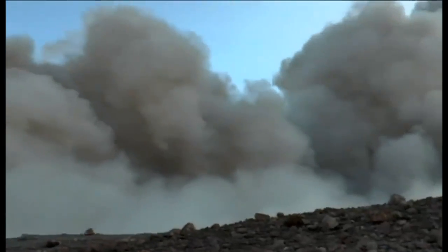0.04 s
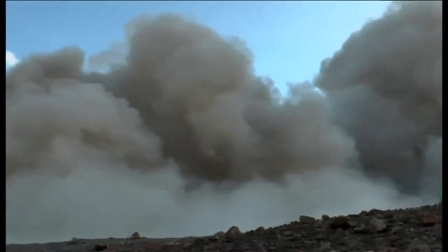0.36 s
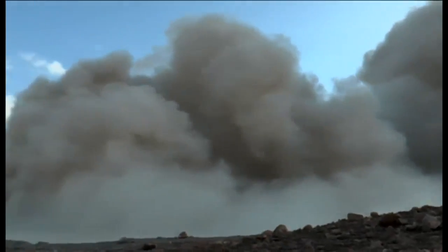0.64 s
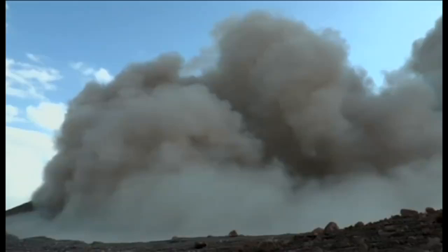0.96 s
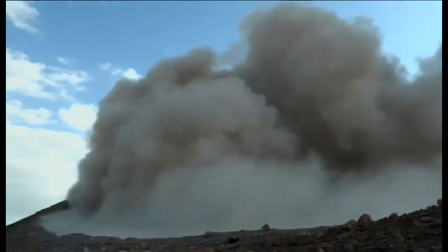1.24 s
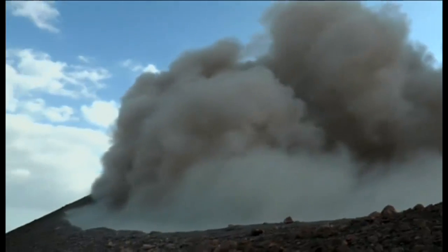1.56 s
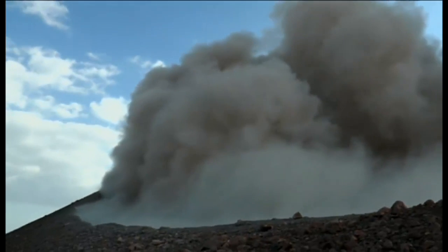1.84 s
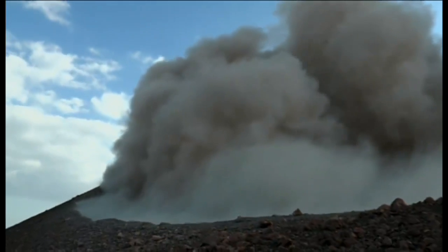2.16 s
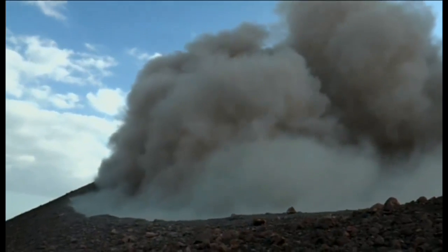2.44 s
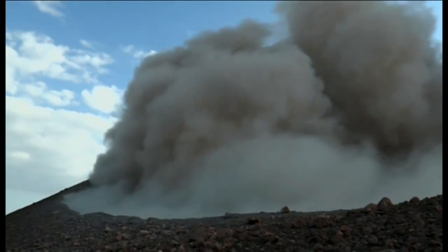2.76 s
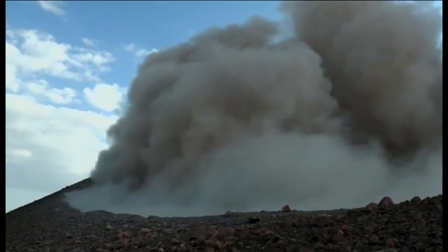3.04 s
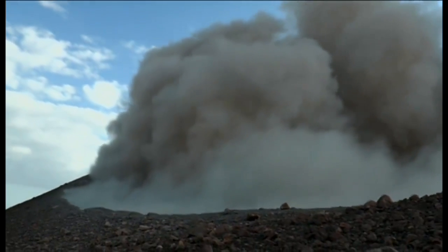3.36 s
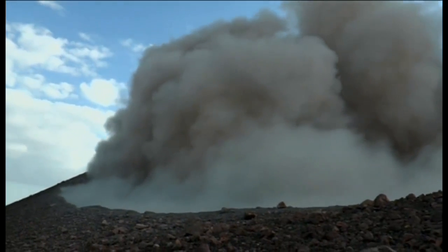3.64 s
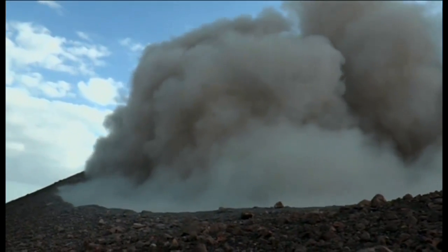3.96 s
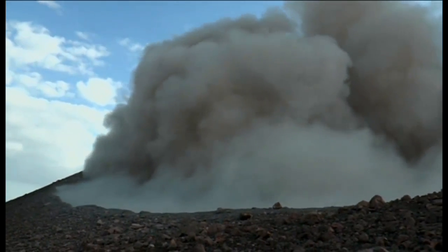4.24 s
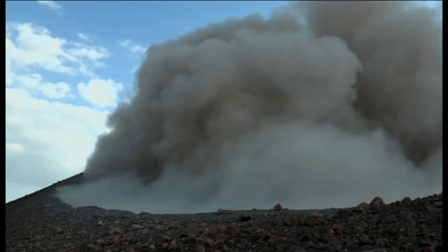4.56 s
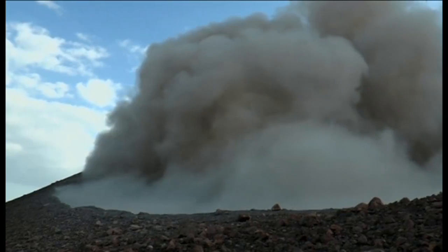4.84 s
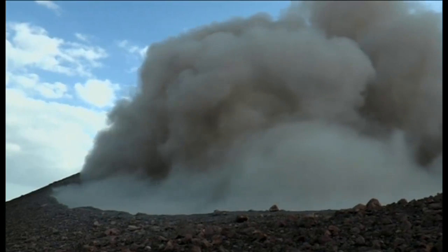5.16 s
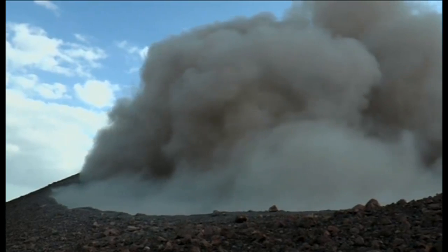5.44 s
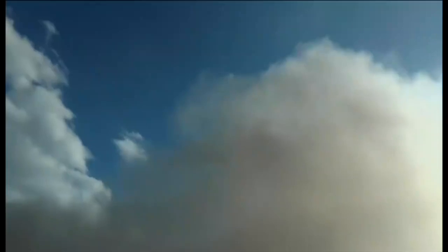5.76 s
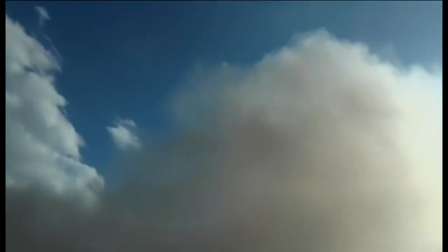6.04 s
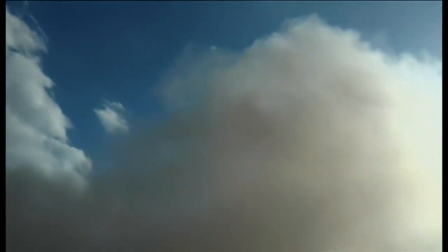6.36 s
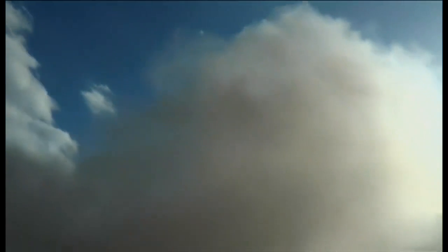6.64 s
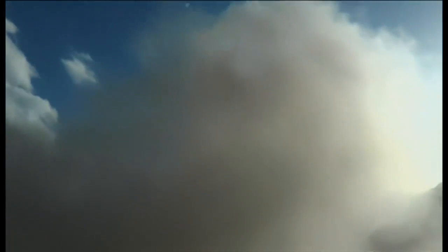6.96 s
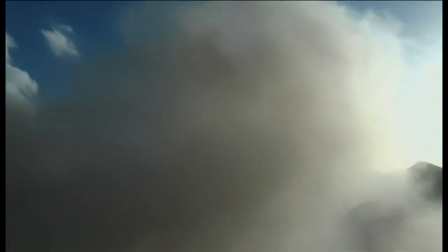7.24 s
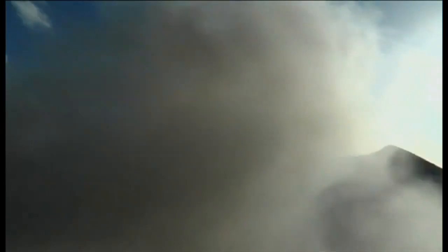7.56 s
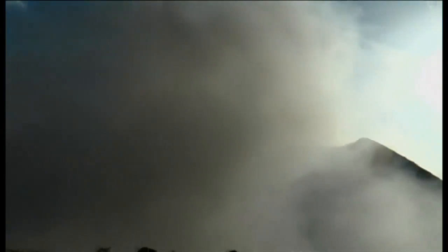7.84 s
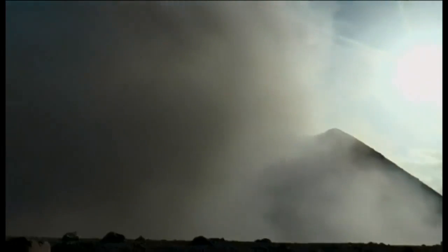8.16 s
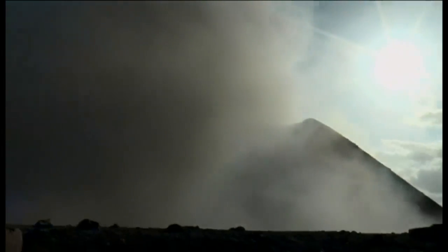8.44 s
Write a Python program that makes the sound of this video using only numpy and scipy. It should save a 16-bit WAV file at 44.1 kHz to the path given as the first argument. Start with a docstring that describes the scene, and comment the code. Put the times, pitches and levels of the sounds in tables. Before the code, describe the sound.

Outdoors on an open rocky slope, wind hits the microphone directly, rumbling, fluttering and popping, and dropping away for instants. A distant ash flow hisses very faintly underneath, and a few loose stones barely clink. Then the breeze changes abruptly to a fuller, more even roar, with a rough rush, light rustling grit and sharp buffets near the end.

```python
"""On a bare volcano slope, gusty wind buffets a camera microphone while an ash flow hisses far off. Slow air
rumbles and drops into brief lulls; as it speeds up, its swirls (eddies) pass faster and the rumble rises into
ragged puffs and sharp pops. Blown grit rustles and a few loose stones clink. With a click the scene changes to
a stronger, steadier wind roar; a limiter holds the peaks down."""
import sys
import numpy as np
from scipy import signal
from scipy.fft import rfft, irfft, next_fast_len
from scipy.io import wavfile
from scipy.ndimage import uniform_filter1d, minimum_filter1d, map_coordinates

SR = 44100
rng = np.random.default_rng(int(sys.argv[2]) if len(sys.argv) > 2 else 0)


def wav_record(signal):
    """Record a signal, one row per channel, as 16-bit PCM in the file named by sys.argv[1]."""
    frames = np.transpose(np.atleast_2d(signal))
    bounded = np.clip(frames, -1, 1)
    # unit amplitude maps onto the largest positive 16-bit level
    quanta = np.round(bounded * 32767).astype(np.int16)
    wavfile.write(sys.argv[1], SR, quanta)


N = 374409
T = np.arange(N) / SR
GALE_START_S = 5.678


def amp(db):
    """Turn decibels into a gain to multiply by."""
    return 10 ** (np.asarray(db) / 20)


def unit(x):
    """Scale x to an average (rms) level of 1."""
    return x / np.sqrt(np.mean(x ** 2) + 1e-20)


def curves(rows):
    """Join a table's rows with straight lines: one curve for each column after the time."""
    times, *columns = np.transpose(rows)
    return [np.interp(T, times, column) for column in columns]


def wobble(per_s):
    """A smooth curve through per_s random values a second."""
    return map_coordinates(rng.standard_normal(8192), [T * per_s + 2], mode="wrap")


def bell(s, duration):
    """A smooth bump of height 1 at time s, duration seconds wide at half height."""
    bump = np.zeros(N)
    near = slice(max(int((s - .25) * SR), 0), int((s + .25) * SR))
    bump[near] = .5 ** ((2 * (T[near] - s) / duration) ** 2)
    return bump


def swells(rows):
    """A loudness curve made of bumps (time [s], level [dB], duration [s]) whose powers add."""
    return np.sqrt(sum(amp(db) ** 2 * bell(s, duration) for s, db, duration in rows))


def gain_at(tone, hz):
    """Read the gain at hz from a tone table (frequency [Hz], level [dB])."""
    freqs, db = np.transpose(tone)
    return amp(np.interp(np.log(hz + 1), np.log(freqs + 1), db))


def filtered(x, response):
    """Turn each frequency in x up or down by response(hz)."""
    size = next_fast_len(N + 8192)
    return irfft(rfft(x, size) * response(np.fft.rfftfreq(size, 1 / SR)), size)[:N]


def coloured(x, tone):
    """Shape x with a tone table, at an average level of 1."""
    return unit(filtered(x, lambda hz: gain_at(tone, hz)))


def noise(tone):
    """Smooth noise with the given tone."""
    return coloured(rng.standard_normal(N), tone)


def turbulence(tone, lumps_db, span_s):
    """Churning air: noise that comes in quick lumps but stays even over span_s seconds."""
    lumpy = coloured(rng.standard_normal(N) * amp(lumps_db), tone)
    width = max(int(span_s * SR), 8)
    power = uniform_filter1d(uniform_filter1d(lumpy ** 2, width), width)
    return unit(lumpy / np.sqrt(np.abs(power) + 1e-4))


def spikes(tone, per_s):
    """Sharp jumps in air pressure at random times, slightly uneven in size."""
    hits = rng.random(N) < per_s / SR
    return coloured(hits * amp(0.5 * rng.standard_normal(N)), tone)


# the breeze between puffs (time [s], rumble level [dB], flutter level [dB])
BREEZE_LEVELS = [(0.0, -21.5, -34), (0.53, -22, -38), (0.78, -22.0, -33.5), (1.18, -20.0, -34),
                 (1.45, -19.5, -42), (2.01, -19, -38.5), (2.23, -22.5, -48), (2.57, -19.5, -42),
                 (2.78, -20.5, -46), (3.27, -20.0, -44), (3.58, -18.5, -41), (3.82, -18, -43.5),
                 (4.23, -19.0, -52), (4.85, -22, -39), (5.03, -22.5, -37), (5.27, -19.0, -42.0),
                 (5.68, -20.0, -36.5)]
# tones (frequency [Hz], level [dB])
EDDY_TONE = [(30, 6.5), (300, -2.5), (450, -2), (600, -6.5), (850, -11.5), (1600, -22), (3200, -37.5),
             (6400, -61), (12000, -81)]  # swirling air at full speed
PORT_TONE = [(12, -19.5), (25, -29), (38, -23), (65, -6), (105, 2), (165, 3), (245, 1), (350, 0.5),
             (700, -2), (2000, -10)]  # how the port, the microphone's opening, colours the wind
TEAR_TONE = [(500, -1), (1200, 16), (2000, 6), (3000, -1.5), (4700, -8), (5800, -18.5), (8000, -25.5),
             (11000, -35)]  # air tearing on the port's edge
SPIKE_TONE = [(200, -11), (600, -1.5), (1200, 0), (2000, -9), (4000, -29), (8000, -40.5), (12000, -56.5)]  # single pressure spikes


def gusts(thump, lull_db):
    """A fixed pattern of eddies blows past the port: faster air plays it higher and rougher."""
    rumble_db, flutter_db = curves(BREEZE_LEVELS)
    flap, spit = wobble(per_s=80), wobble(per_s=300)
    breeze_flutter = amp(flutter_db - lull_db - 1.59 + 3 * flap + 3 * spit)
    puff_flutter = amp(0.3946 + 0.708 * flap + 2.2 * spit) * thump
    flutter = np.hypot(breeze_flutter, puff_flutter)
    rumble = amp(rumble_db - lull_db + 1.08 * wobble(per_s=18))
    force = np.hypot(rumble, .55 * flutter)
    # the share of flutter sets the air speed, 1 at full wind
    speed = np.clip((flutter / force) ** .44, .15, 1.3)
    eddies = turbulence(EDDY_TONE, 2.4 * wobble(250), span_s=0.013)
    pressure = map_coordinates(eddies, [np.cumsum(speed)], mode="wrap")
    buffet = filtered(amp(4.5) * force * speed ** 0.071 * pressure, lambda hz: gain_at(PORT_TONE, hz))
    # air dragging over the port's edge adds a faint rasp and sharp spikes
    rasp = amp(-35) * turbulence(TEAR_TONE, 4 * wobble(600), span_s=.03)
    sputter = amp(-22.5) * spikes(SPIKE_TONE, per_s=110)
    return buffet + flutter * (rasp + sputter)


# slow swells under the breeze, even in the lulls (time [s], level [dB])
DEEP_LEVELS = [(0.0, -29.5), (1.3, -36), (2.0, -37), (3.9, -39.5), (4.7, -34.5), (5.68, -36)]
# their tone (frequency [Hz], level [dB])
DEEP_TONE = [(10, -3.5), (22, 1), (45, -3), (70, 1), (110, -11), (250, -49), (600, -120)]


def deep_rumble():
    """Large, slow eddies press on the microphone."""
    level_db, = curves(DEEP_LEVELS)
    return amp(level_db) * noise(DEEP_TONE)


# the distant ash flow (time [s], hiss level [dB], roar level [dB])
ASH_LEVELS = [(0.0, -64.5, -57), (1.59, -64.5, -46), (2.14, -65, -49.5), (2.86, -59.5, -45),
              (3.1, -67.5, -55.5), (3.42, -58, -45), (3.8, -67.5, -49.5), (4.24, -66, -44),
              (4.73, -67.5, -61), (5.22, -64, -54.5), (5.68, -65, -45.5)]
# tones of its hiss and its roar (frequency [Hz], level [dB])
ASH_HISS_TONE = [(400, -13), (900, 7.5), (1600, 0.5), (2800, 2), (4200, -5), (7000, -12), (11000, -32)]
ASH_ROAR_TONE = [(100, -5.5), (350, 3), (600, 4.5), (1000, -3), (1600, -10.5), (2500, -19), (4000, -38.5),
                 (8000, -60)]


def ash_flow():
    """Far stones and ash tumble down the slope: a dull roar under a soft, uneven hiss."""
    hiss_db, roar_db = curves(ASH_LEVELS)
    surge = wobble(per_s=25)
    hiss = amp(hiss_db + 1.7 * surge) * noise(ASH_HISS_TONE)
    roar = amp(roar_db + 0.74 * surge) * noise(ASH_ROAR_TONE)
    return hiss + roar


# tone of the microphone's hiss (frequency [Hz], level [dB])
MIC_TONE = [(100, 5), (4000, -0.5), (8000, 2), (10000, -4), (15500, -1)]


def microphone_hiss():
    """The microphone makes a faint, steady noise of its own."""
    return amp(-67) * noise(MIC_TONE)


# eddies that hit the port (time [s], thump level [dB], tearing level [dB], duration [s])
EDDY_HITS = [(0.018, -28.5, -47, 0.033), (0.174, -19.5, -50, 0.02), (0.231, -31, -46.5, 0.014),
             (0.288, -26.5, -47.5, 0.018), (0.396, -22, -46.5, 0.024), (0.606, -26.5, -53.5, 0.015),
             (0.632, -21, -51, 0.0089), (0.799, -26, -56.5, 0.0058), (0.838, -22.5, -55, 0.024),
             (0.899, -19.5, -43, 0.0086), (0.92, -26, -45, 0.014), (1.023, -25, -50, 0.008),
             (1.052, -22, -40, 0.016), (1.158, -28, -57, 0.021), (1.244, -26.0, -52, 0.06),
             (1.356, -28, -66, 0.016), (1.545, -29, -51.5, 0.0087), (1.925, -31, -51, 0.038),
             (2.015, -28.5, -48.5, 0.043), (2.438, -34, -48, 0.012), (2.539, -38, -48.5, 0.0068),
             (2.67, -29, -59, 0.015), (2.952, -29.5, -54, 0.024), (3.041, -26, -64, 0.017),
             (3.46, -29, -56, 0.015), (3.618, -33.5, -49, 0.03), (3.714, -29, -63.5, 0.015),
             (3.929, -35, -52, 0.043), (4.07, -32, -59, 0.051), (4.195, -26.5, -49, 0.038),
             (4.271, -27, -56.5, 0.041), (4.385, -30.5, -57.5, 0.016), (4.465, -36, -51, 0.042),
             (4.57, -22.5, -48.5, 0.032), (4.907, -30, -48, 0.011), (4.994, -23.5, -52, 0.014),
             (5.134, -26.5, -52.5, 0.021), (5.253, -24.5, -63, 0.012), (5.287, -31.5, -58, 0.05),
             (5.455, -30, -56, 0.014), (5.492, -35, -50.5, 0.02), (5.535, -28, -46.5, 0.012),
             (6.477, -25, -41.5, 0.027), (6.571, -24, -36.5, 0.033), (7.838, -19, -37, 0.017),
             (8.144, -20, -36, 0.0082), (8.181, -27.5, -33.5, 0.0036), (8.352, -26, -39.5, 0.012),
             (8.426, -22.5, -41.5, 0.021), (8.469, -23.5, -38, 0.032)]


def puffs():
    """Fast eddies hit the port: returns a thump curve that swells the wind, and a tearing sound."""
    thump = swells((s, db, duration) for s, db, _, duration in EDDY_HITS)
    tear = swells((s, db, duration) for s, _, db, duration in EDDY_HITS)
    return thump, amp(-1.1) * tear * turbulence(TEAR_TONE, 5.9 * wobble(450), span_s=0.023)


# single eddies bursting (time [s], level [dB], pitch [Hz])
EDDY_BURSTS = [(0.037, -22.5, 850), (0.1789, -24, 680), (0.2493, -8.5, 457), (0.284, -8, 332),
               (0.3975, -22.5, 930), (0.5302, -11.5, 332), (0.5729, -16, 600), (0.631, -10, 600),
               (0.634, -11.5, 596), (0.6446, -25, 940), (0.6908, -24, 700), (0.7401, -16, 530.4),
               (0.8306, -19, 623.4), (0.8434, -15.5, 611.3), (0.8985, -10.5, 630), (0.9103, -16.5, 560),
               (0.9188, -16.5, 720), (0.9319, -14, 571.3), (0.9814, -9.5, 380), (1.0217, -12.5, 517),
               (1.048, -17, 715), (1.1462, -11, 558.3), (1.1644, -17, 569), (1.186, -10, 680),
               (1.2224, -20, 710), (1.2507, -20.5, 750), (1.2982, -18.5, 718.5), (1.3483, -25.5, 730),
               (1.3646, -15.0, 330), (1.4783, -17, 430.3), (1.5443, -18.5, 518.4), (1.5872, -17, 478.7),
               (1.7242, -12.5, 415), (2.0122, -20.5, 608.8), (2.0324, -17, 568.3), (2.6608, -16, 589),
               (2.6773, -18, 560), (2.9468, -24, 540), (3.0448, -13.5, 550), (3.4666, -14.5, 480),
               (3.7109, -13, 479.7), (3.7355, -20.5, 450), (3.9083, -16, 458.8), (4.0997, -18, 699.4),
               (4.178, -14, 569.6), (4.3873, -14, 450), (4.4449, -21, 710), (4.554, -8.5, 520),
               (4.604, -23, 610.7), (4.9136, -15, 610), (5.0007, -10.5, 399.6), (5.0403, -15.5, 519.4),
               (5.1366, -14, 619.5), (5.147, -20, 521), (5.2654, -22, 711), (5.3067, -15, 550.7),
               (5.3317, -17, 419.7), (5.359, -16.5, 544), (5.3842, -18, 444), (5.4451, -21.5, 679),
               (5.5355, -12, 520), (5.8106, -16, 419.8), (5.9125, -14.5, 820), (6.0822, -6.5, 440),
               (6.1257, -15, 600), (6.348, -7, 660), (6.483, -12, 700), (6.4945, -17, 710),
               (6.5938, -14.5, 517), (7.0211, -9.5, 444), (7.483, -6.5, 520), (7.616, -7, 450),
               (7.7667, -8, 400), (7.8528, -10.5, 710), (8.1475, -13.5, 820), (8.1813, -17, 850),
               (8.3201, -10, 644), (8.3429, -17.5, 850), (8.425, -15, 800), (8.456, -11, 820),
               (8.4774, -1.5, 820)]


def pops(damping=1.04, fray=.45, fray_s=.0035):
    """An eddy bursts at the port: one steep, frayed swing of pressure, shorter for a smaller eddy."""
    out, size = np.zeros(N + SR), 2048
    middle = size // 2
    fray_shape = .5 ** ((2 * (np.arange(size) - middle) / SR / fray_s) ** 2)
    for s, db, hz in EDDY_BURSTS:
        ratio = 1j * np.fft.rfftfreq(size, 1 / SR) / hz
        band = ratio / (1 + damping * ratio + ratio ** 2) ** 2  # a broad hump around the pitch
        phase = np.exp(2j * np.pi * rng.random())
        swing = unit(np.roll(irfft(phase * band), middle))
        shreds = unit(signal.fftconvolve(fray_shape * rng.standard_normal(size), swing, "same"))
        burst = unit(swing + fray * shreds) / np.abs(swing).max()
        start = max(round(s * SR) - middle, 0)
        out[start:start + size] += amp(db) * burst
    return out[:N]


# pockets of slack air (time [s], depth [dB], duration [s])
SLACK_AIR = [(0.095, 13.5, 0.066), (0.209, 8, 0.025), (0.265, 7, 0.01794), (0.34, 9.5, 0.06),
             (0.472, 8.0, 0.09), (0.515, 13, 0.007), (0.558, 13.5, 0.014), (0.672, 18, 0.02),
             (0.88, 6.5, 0.02005), (0.955, 6, 0.0249), (1.008, 4.5, 0.0092), (1.175, 10, 0.00996),
             (1.332, 6, 0.01349), (1.45, 5, 0.062), (1.868, 9, 0.02526), (2.119, 8, 0.052),
             (2.269, 7.5, 0.037), (2.4, 10, 0.0298), (2.593, 5.5, 0.015), (2.854, 8, 0.065),
             (3.136, 2.5, 0.0966), (3.268, 6, 0.025), (3.359, 2.5, 0.079), (3.787, 11, 0.038),
             (4.335, 8.5, 0.03), (4.415, 6, 0.02002), (4.662, 13.5, 0.0505), (4.744, 24.5, 0.063),
             (4.961, 9.5, 0.02), (5.022, 6, .014), (5.352, 6.5, .012), (5.37, 6, .012), (5.405, 8, 0.04),
             (5.577, 8.5, 0.037), (6.44, 6.5, 0.018), (7.189, 7.5, 0.018), (7.609, 4, 0.016),
             (7.672, 11, 0.012), (8.062, 6, 0.012), (8.171, 6.5, 0.02), (8.264, 8.5, 0.025),
             (8.335, 6.5, 0.01), (8.409, 8.5, 0.013)]


def lulls():
    """The air goes slack for a moment: returns how many decibels the wind drops."""
    return sum(depth_db * bell(s, duration) for s, depth_db, duration in SLACK_AIR)


# flurries of blown grit (time [s], level [dB], duration [s])
GRIT_FLURRIES = [(0.14, -55.5, 0.017), (0.23, -57, 0.11), (0.39, -57, 0.021), (1.1, -64, 0.23),
                 (1.88, -66.5, 0.14), (3.4, -63.5, 0.11), (6.39, -57, 0.076), (7.44, -56, .36),
                 (7.93, -54.5, .3)]
# their tone (frequency [Hz], level [dB])
GRIT_TONE = [(900, -22), (2200, 3.5), (3300, 5.5), (5000, -5), (6000, -12), (8000, -19.5), (11000, -27.5)]


def blown_grit():
    """Gusts sweep fine grit over the ground in a grainy rustle."""
    return swells(GRIT_FLURRIES) * turbulence(GRIT_TONE, 10 * wobble(700), span_s=.02)


# ticks in the hardest buffets (time [s], level [dB], time to fade by 60 dB [s])
WIND_TICKS = [(0.182, -41, 0.0055), (0.259, -48, 0.0043), (0.634, -44, 0.0075), (0.798, -46, 0.0045),
              (0.897, -45.5, 0.0059), (1.185, -49.5, 0.0074), (3.709, -48.5, 0.0086), (3.713, -51, 0.006),
              (5.262, -51.5, 0.048), (8.18, -48.5, 0.012)]
# their tone (frequency [Hz], level [dB])
TICK_TONE = [(1500, -21), (2800, 2), (4500, 7.5), (8500, -3.5), (15000, -18.5)]


def clicks():
    """Tiny bright bursts that die at once, and a louder click where the scene changes."""
    loudness = np.zeros(N)
    for s, db, fade_s in [*WIND_TICKS, (GALE_START_S, -34, 0.0083)]:
        loudness += (T >= s) * amp(db - 60 * np.clip((T - s) / fade_s, 0, 3))
    return loudness * turbulence(TICK_TONE, lumps_db=0, span_s=.001)


# clinks and scrapes of stones (time [s], level [dB], pitch [Hz], duration [s])
STONE_CLINKS = [(3.675, -58.5, 2796, 0.0084), (4.22, -52, 3605, 0.0054), (5.411, -56, 3950, 0.011),
                (5.432, -63.5, 3830, .033), (6.772, -69, 9200, .06)]


def stones():
    """Loose stones knock and slide, each ringing around its own pitch."""
    out = np.zeros(N)
    for s, db, hz, duration in STONE_CLINKS:
        ring = filtered(rng.standard_normal(N), lambda f: 1 / (1 + ((f - hz) / (0.15 * hz)) ** 2))
        out += swells([(s, db, duration)]) * unit(ring)
    return out


# the strong wind (time [s], roar level [dB], rush level [dB])
GALE_LEVELS = [(5.68, -23, -44.5), (5.83, -28, -53.5), (5.87, -17, -36.5), (6.14, -18.5, -38.5),
               (6.19, -22.5, -43), (6.36, -18, -37), (6.71, -20, -43), (7.18, -19, -40.5), (7.32, -18, -36),
               (7.62, -18, -38.5), (7.99, -17.5, -37), (8.26, -21.5, -46.5), (8.49, -25, -43)]
# tones of its low roar and its higher rush (frequency [Hz], level [dB])
ROAR_TONE = [(12, -46.5), (20, -10.5), (38, -21), (59, -10.5), (91, -9.5), (120, -5), (166, -5),
             (255, -3.5), (360, -4.5), (702, -13), (1500, -35), (1950, -48.5), (3300, -120)]
RUSH_TONE = [(500, -6), (1000, 5.5), (1500, -7), (2200, -13.5), (3200, -20), (4800, -27.5), (5800, -34.5),
             (7800, -41), (9500, -46.5), (12000, -54.5)]


def gale(thump, lull_db):
    """Strong, even wind: a broad roar, and a ragged rush that shakes with it, spits and crackles."""
    roar_db, rush_db = curves(GALE_LEVELS)
    lumps, jitter = wobble(per_s=110), wobble(per_s=420)
    force = np.hypot(amp(roar_db - lull_db), amp(6.5) * thump)
    roar = force * turbulence(ROAR_TONE, 2.08 * lumps + 1.74 * jitter, span_s=0.049)
    sputter = amp(-3) * unit(amp(2 * lumps) * spikes(RUSH_TONE, per_s=240))
    rush = amp(1.5) * turbulence(RUSH_TONE, 2.4 * lumps + 3.2 * jitter, span_s=0.05)
    snaps = amp(-9.5) * unit(amp(1.5 * lumps + 2.5 * wobble(45)) * crackle())
    return roar + amp(rush_db - lull_db) * (rush + sputter + snaps)


def crackle(per_s=330, low_hz=1340, high_hz=5000, fade_cycles=0.98):
    """Strong wind frays into tiny snaps, each a few vibrations at its own pitch."""
    when, pitch, size, phase = rng.random((int(per_s * N / SR), 4)).T[:, :, None]
    offsets = np.arange(256)
    hz = low_hz * (high_hz / low_hz) ** pitch
    cycles = hz * (offsets - offsets.mean()) / SR
    snaps = np.sin(2 * np.pi * (cycles + phase)) * np.exp(-(cycles / fade_cycles) ** 2)
    gain = amp(-3.6 * np.log(size + .02) - 15 * pitch)  # a few stand out; higher ones are weaker
    positions = (when * N).astype(int) + offsets
    return unit(np.bincount(positions.ravel(), (gain * snaps).ravel(), N)[:N])


def scene():
    """Puffs, pops and lulls ride on the wind; breeze and ash flow give way at once to the gale."""
    thump, tearing = puffs()
    lull_db = lulls()
    gale_share = np.clip((T - GALE_START_S) / .004 + .5, 0, 1)
    breeze_and_ash = gusts(thump, lull_db) + deep_rumble() + ash_flow()
    wind = (1 - gale_share) * breeze_and_ash + gale_share * gale(thump, lull_db)
    return (wind + tearing + pops() + blown_grit() + clicks() + stones() + microphone_hiss())[None]


def limiter(x, ceiling_db, hold_s):
    """Turn the volume down smoothly around every peak above the ceiling."""
    width = max(int(hold_s * SR), 8)
    needed_gain = np.minimum(1, amp(ceiling_db) / (np.abs(x) + 1e-9))
    held_gain = minimum_filter1d(needed_gain, 2 * width)
    return x * uniform_filter1d(uniform_filter1d(held_gain, width), width)


def record(dry):
    """The camera holds the peaks down and cuts off the very highest treble."""
    limited = limiter(dry[0], ceiling_db=-6.6, hold_s=.0012)
    return filtered(limited, lambda hz: hz < 15750)[None]


dry = scene()
out = record(dry)
wav_record(out)
```